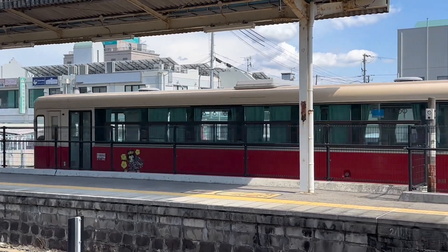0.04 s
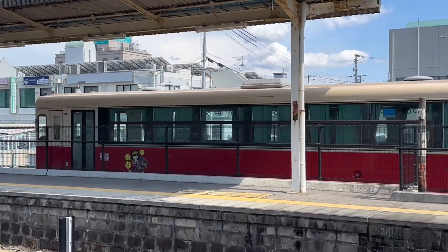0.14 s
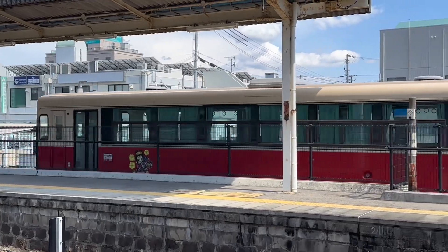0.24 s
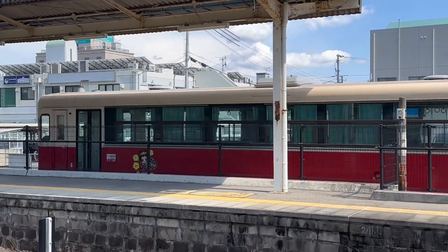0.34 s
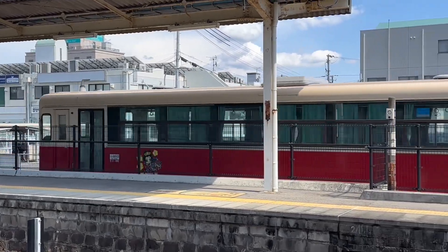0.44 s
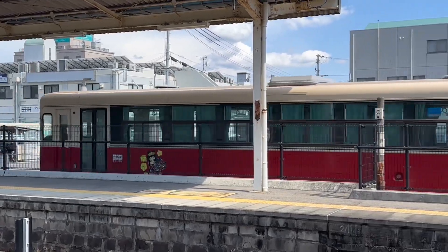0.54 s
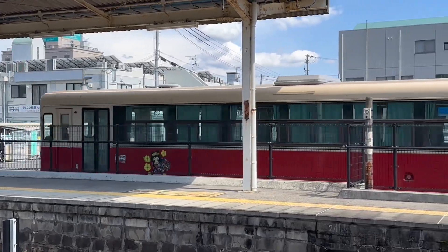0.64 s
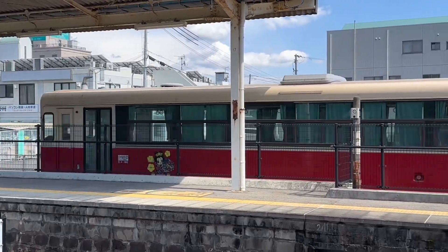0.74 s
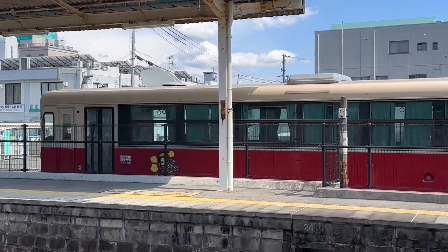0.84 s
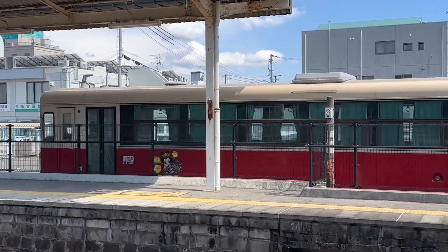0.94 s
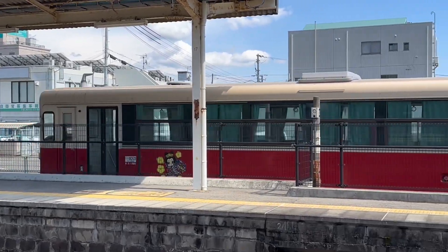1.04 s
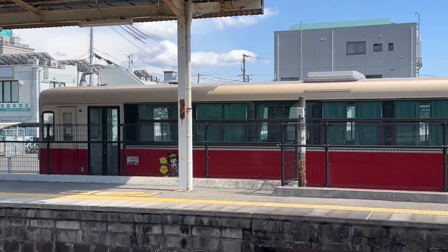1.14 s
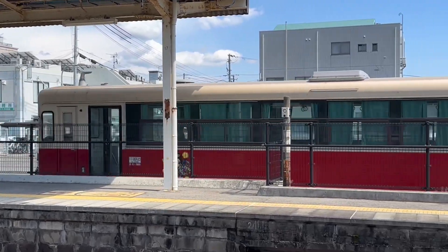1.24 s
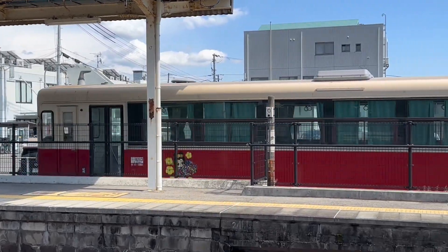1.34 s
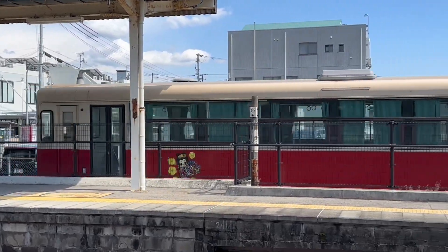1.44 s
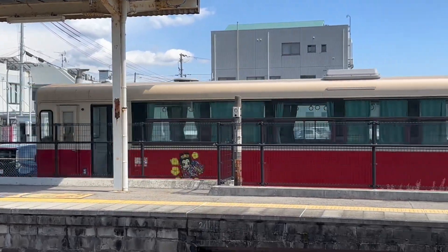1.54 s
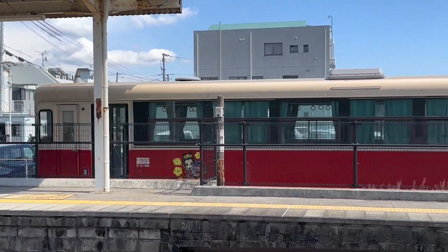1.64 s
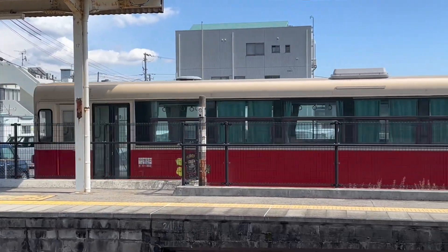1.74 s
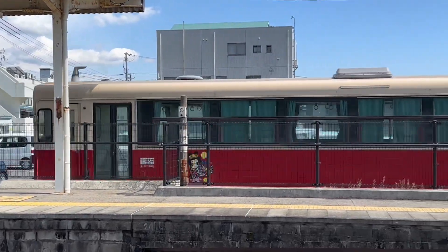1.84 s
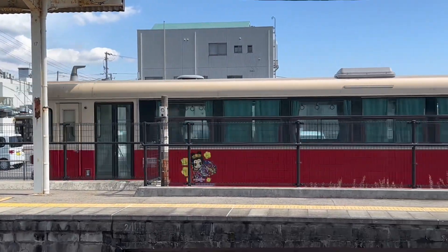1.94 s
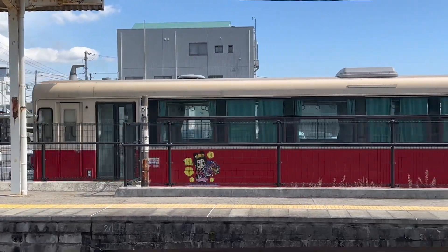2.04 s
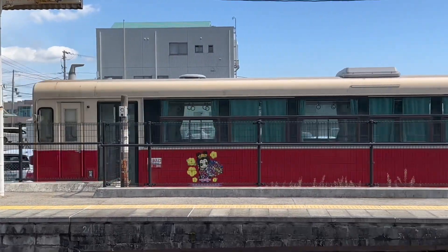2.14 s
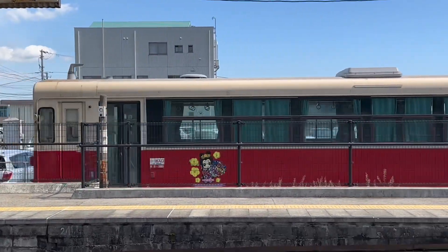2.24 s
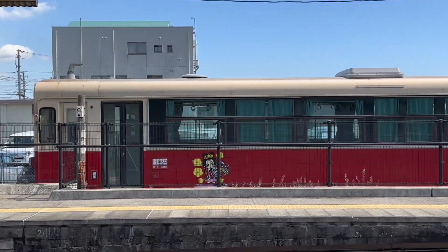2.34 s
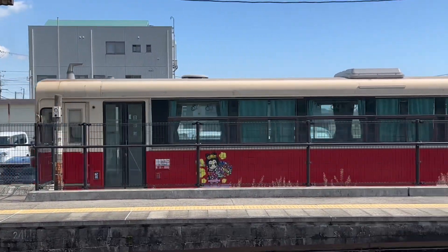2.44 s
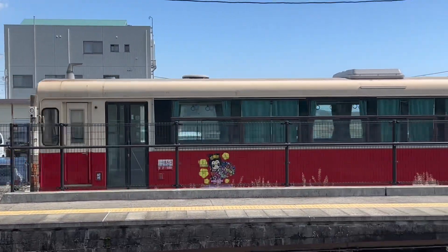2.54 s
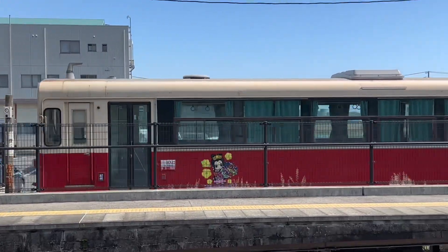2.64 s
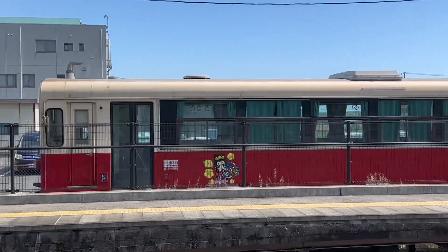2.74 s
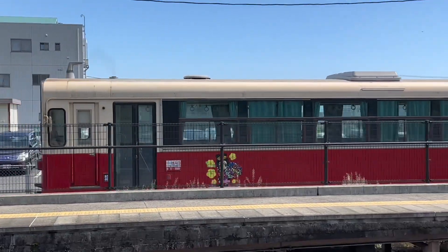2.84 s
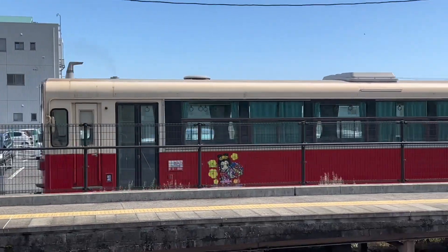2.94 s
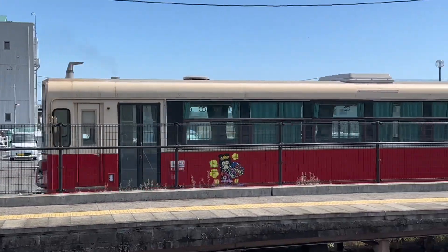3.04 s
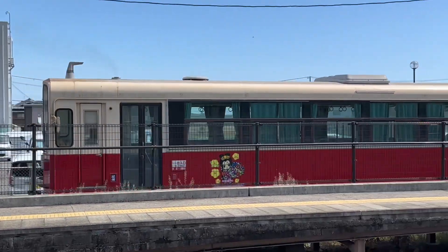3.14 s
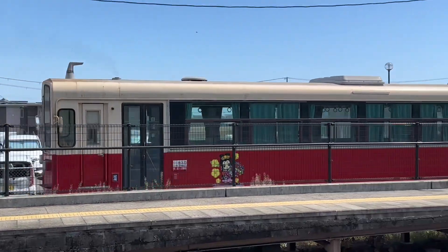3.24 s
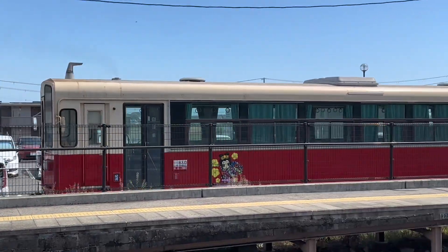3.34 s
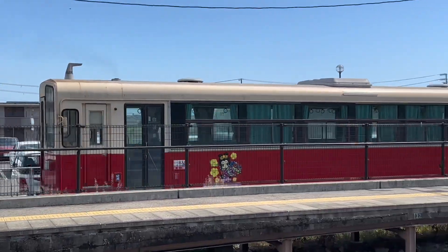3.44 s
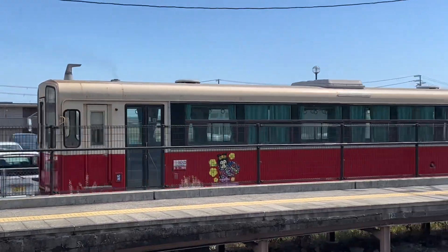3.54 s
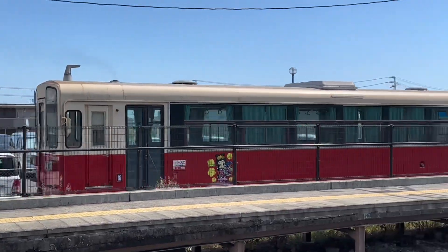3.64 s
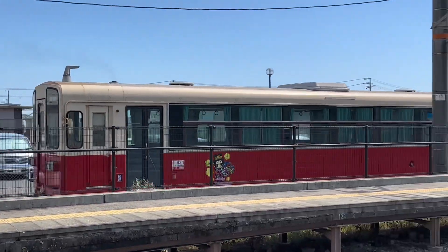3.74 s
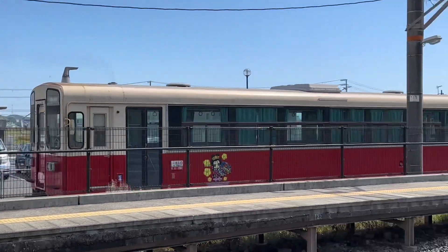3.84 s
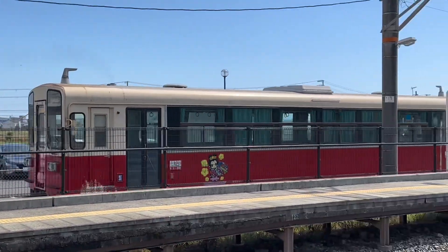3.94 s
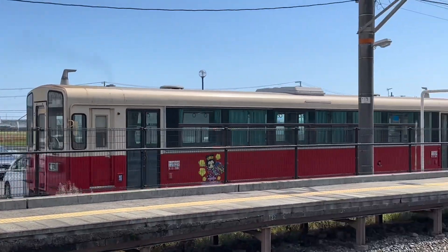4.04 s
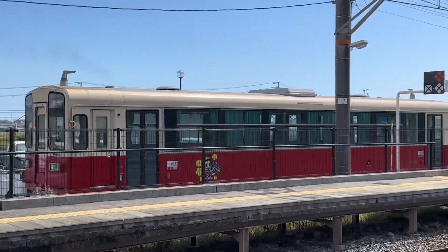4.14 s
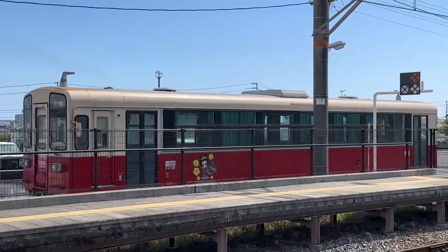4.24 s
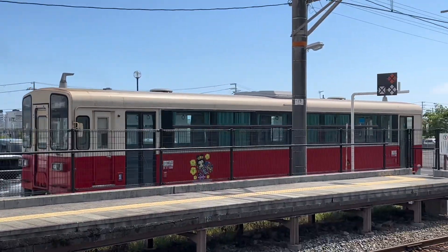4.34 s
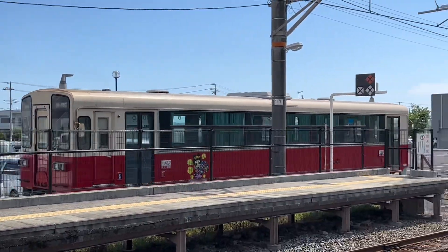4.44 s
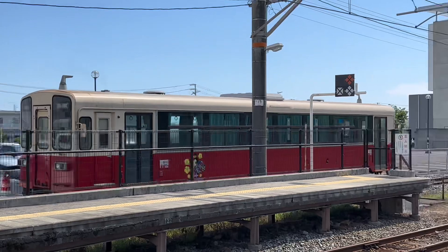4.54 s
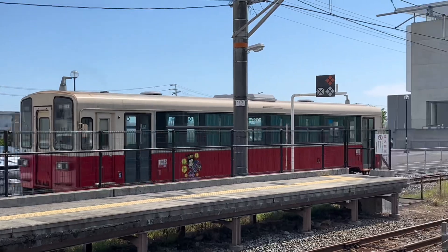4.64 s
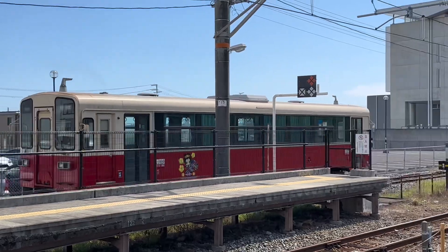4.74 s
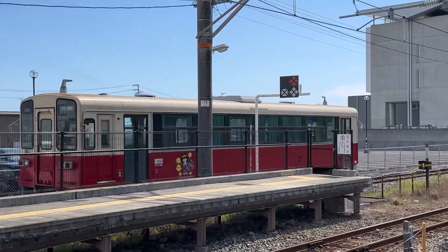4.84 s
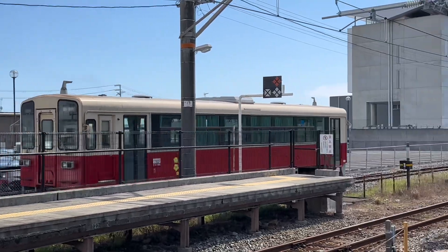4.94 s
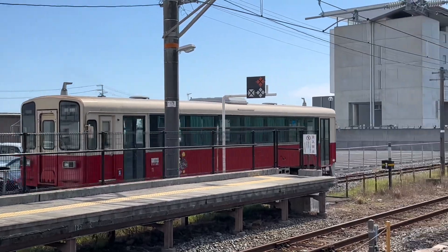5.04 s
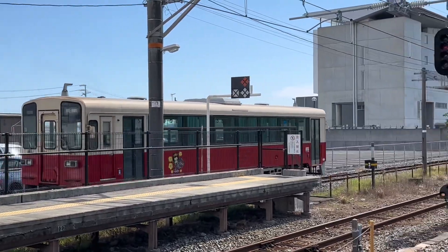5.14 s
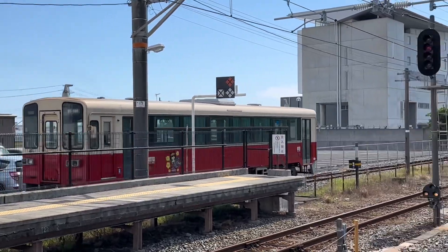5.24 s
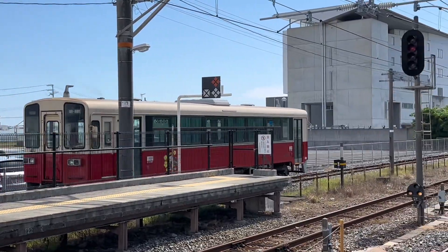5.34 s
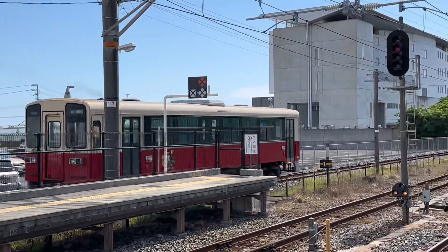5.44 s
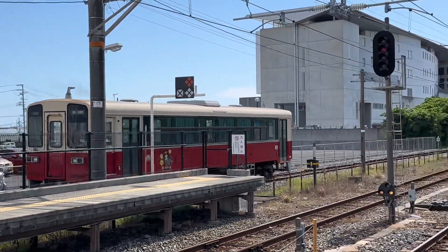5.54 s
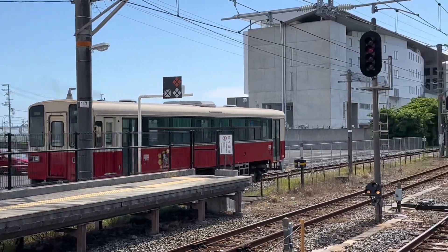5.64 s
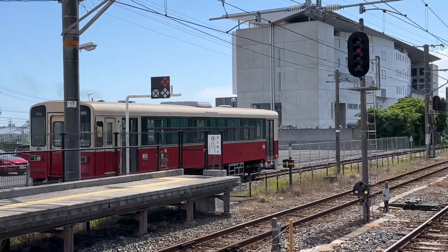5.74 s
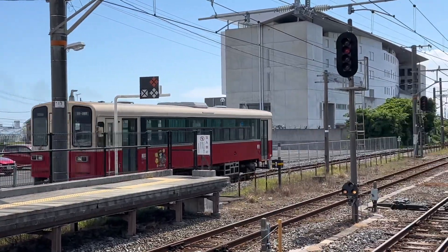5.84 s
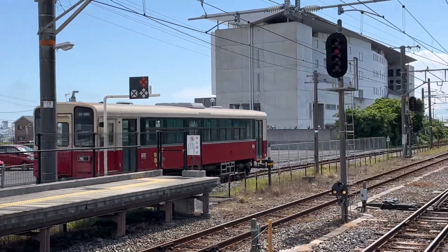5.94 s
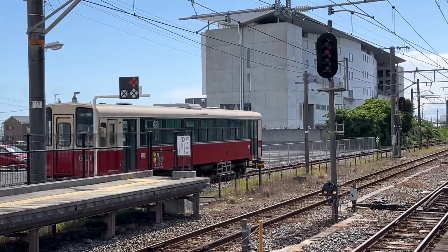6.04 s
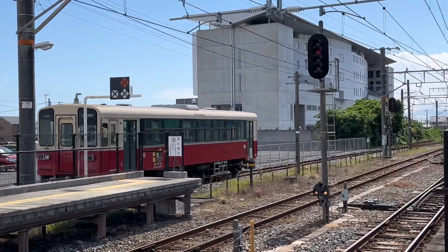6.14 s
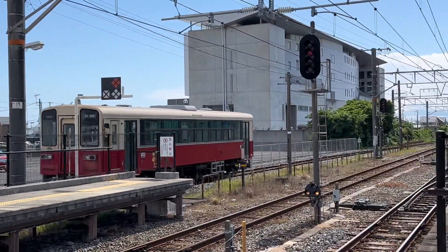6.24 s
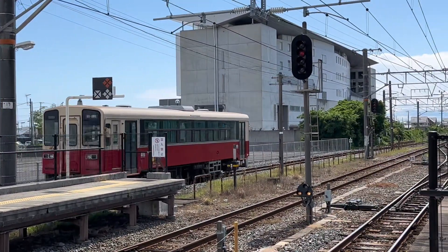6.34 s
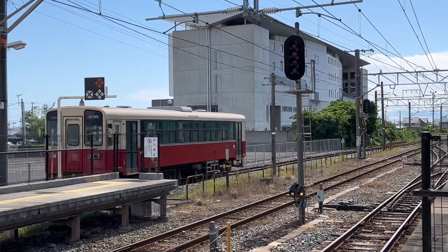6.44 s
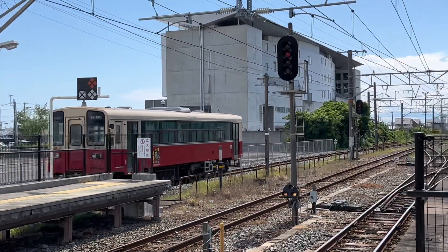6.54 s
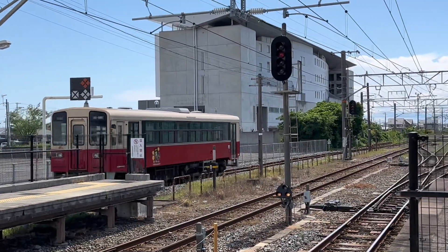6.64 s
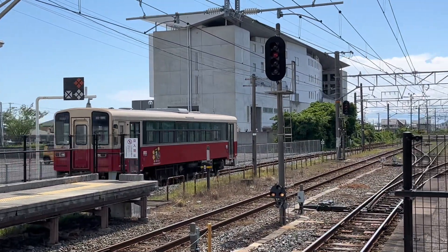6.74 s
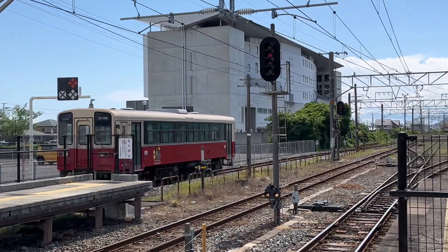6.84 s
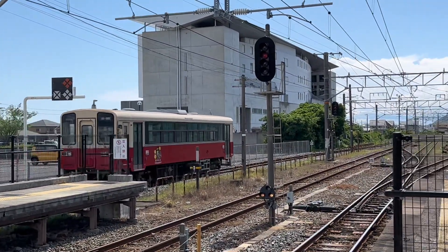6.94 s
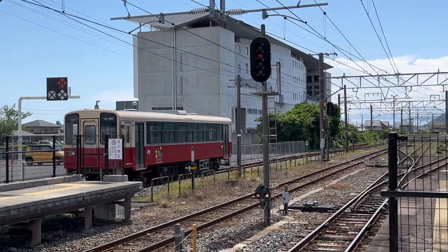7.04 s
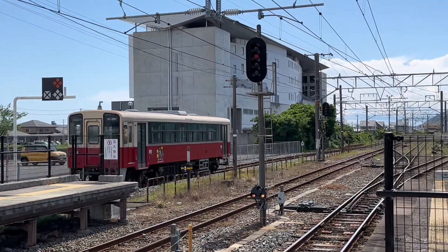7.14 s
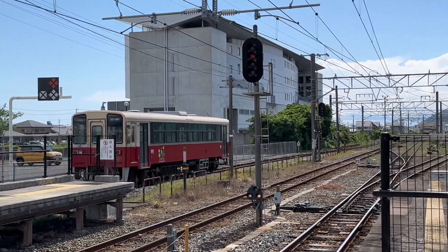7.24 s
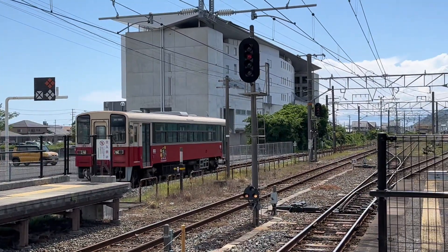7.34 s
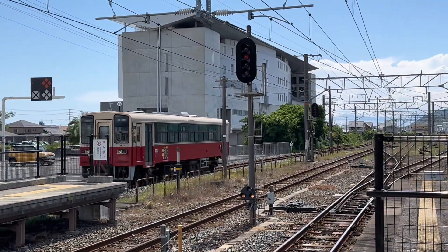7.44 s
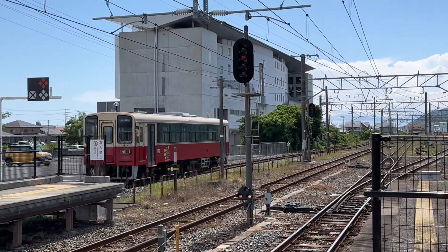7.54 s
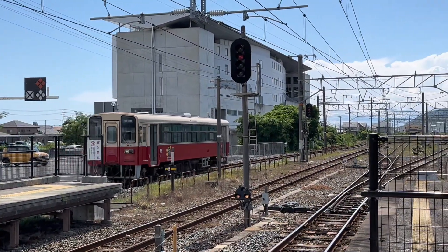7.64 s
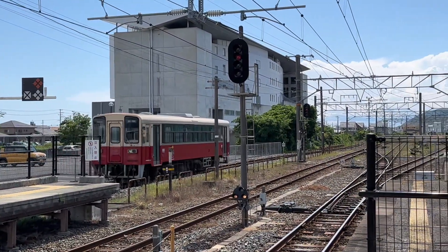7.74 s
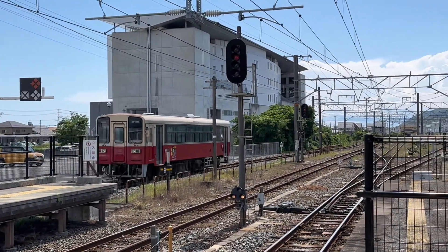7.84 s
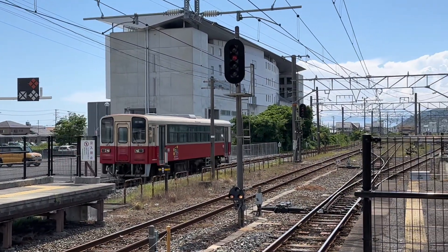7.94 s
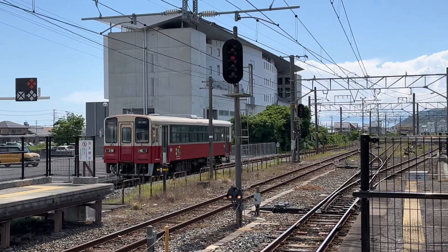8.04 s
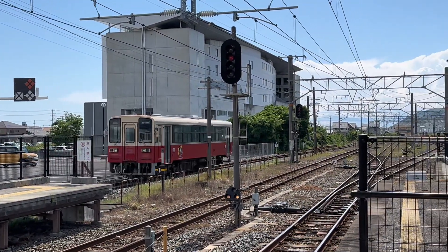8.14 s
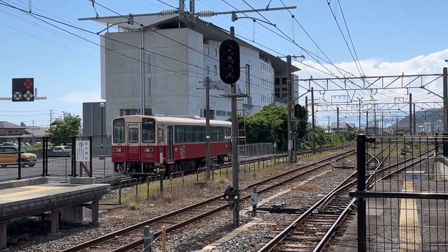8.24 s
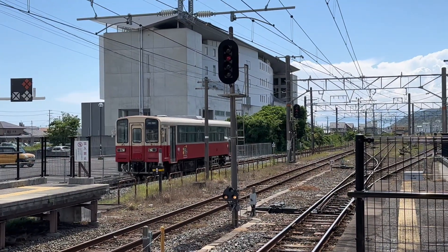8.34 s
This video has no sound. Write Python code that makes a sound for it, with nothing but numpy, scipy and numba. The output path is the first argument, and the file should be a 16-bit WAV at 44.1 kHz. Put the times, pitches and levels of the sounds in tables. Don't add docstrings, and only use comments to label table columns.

```python
import sys
import numpy as np
from scipy import signal
from scipy.fft import rfft, irfft, next_fast_len
from scipy.io import wavfile
from scipy.ndimage import uniform_filter1d
from numba import njit

SR = 44100
rng = np.random.default_rng(int(sys.argv[2]) if len(sys.argv) > 2 else 0)


def int16_out(signal):
    q = np.round(np.clip(np.atleast_2d(signal).T, -1, 1) * 32767)
    wavfile.write(sys.argv[1], SR, q.astype(np.int16))


def makeup_ratio(level_db):
    decades = np.asarray(level_db, float) / 20
    return 10 ** decades


N = 369999
TIME = np.arange(N) / SR
SIZE = next_fast_len(N)
FREQ = np.maximum(np.arange(SIZE // 2 + 1) * SR / SIZE, 1)


def level(x, db):
    return x * makeup_ratio(db) / np.sqrt(np.mean(x ** 2))


def over_time(table):
    s, *columns = np.transpose(table)
    return [np.interp(TIME, s, c) for c in columns]


def over_hz(table):
    hz, value = np.transpose(table)
    return np.interp(np.log(FREQ), np.log(hz), value)


def colour(x, db):
    return level(irfft(rfft(x, SIZE) * makeup_ratio(db), SIZE)[:N], 0)


def noise():
    return rng.standard_normal(N)


def walk(rate, count=N):
    hold = int(SR / rate)
    steps = np.repeat(rng.standard_normal(count // hold + 1), hold)
    return 1.352 * uniform_filter1d(uniform_filter1d(steps, hold), hold)[:count]


# time in seconds, clatter level in dB, engine effort from 0 to 1.
RAILCAR = [(0, -42, 0.84), (.7, -41, 0.56), (1.29, -40, 0.45), (1.55, -36.5, 0.27), (2.4, -36.5, 0.66),
           (2.85, -35.5, 0.47), (3.8, -38, 0.86), (4.3, -38.5, 0.7), (5.16, -42, 0.32), (5.5, -44.5, 0.35),
           (6.2, -49, 0.02), (6.94, -52.5, 0.36), (7.5, -51, 0), (8.06, -54.5, 0.23), (8.39, -55.5, 0.6)]
# time in seconds, firing rate in Hz, level in dB.
FIRING = [(0, 62.1, -47), (.4, 63.98, -31.5), (1, 65.03, -37), (1.4, 68.98, -46.5), (1.9, 73.5, -41.5),
          (2.5, 74.5, -32), (3.1, 76.17, -34), (3.6, 76.64, -44), (4.4, 76.96, -35.5), (5.5, 75.86, -46.5),
          (8.39, 74.26, -49.5)]
# frequency in Hz, density in dB per Hz.
CLATTER_COLOUR = [(60, 10.5), (200, 11), (500, 4), (1000, 6.5), (1900, 1.5), (2700, -6), (3900, -9),
                  (5500, -10.5), (7500, -8.5), (10500, -11), (12200, -19), (15500, -22)]
# centre in Hz, width in Hz, boost in dB.
CASING = [
    (774.3, 55.3, 5),
    (926, 55.4, 3.5),
    (1050, 157, 4),
    (1499, 51, 5),
    (3367, 412, 5.5),
    (6630, 1000, -2),
]
RING_FADES_S = (4.35, 7.3)


def engine():
    hz, note_db = over_time(FIRING)
    phase = 2 * np.pi * np.cumsum(hz * (1 + 0.00609 * walk(12))) / SR
    note = np.sqrt(2) * makeup_ratio(note_db + 1.95 * walk(8.9)) * (np.sin(phase) + 0.217 * np.sin(2 * phase))

    combustion = makeup_ratio(1.2 * np.sin(phase) + .6 * np.sin(phase / 3)) * noise()
    ring_db = sum(db / (1 + (2 * (FREQ - f) / width) ** 2) for f, width, db in CASING)
    spectrum = rfft(combustion, SIZE) * makeup_ratio(over_hz(CLATTER_COLOUR))
    reference = spectrum * makeup_ratio(ring_db) * (FREQ > 1800) * (FREQ < 6500)
    spectrum = spectrum / np.std(irfft(reference, SIZE))
    ring_share = np.interp(TIME, RING_FADES_S, (1, .4))

    clatter_db, effort = over_time(RAILCAR)
    casing_db = -5 + 8.5 * effort
    hiss_db = -3.5 + 3 * effort + 0.279 * (clatter_db + 36)
    clatter, shake = 0, walk(4.967)
    for step in np.arange(12, 29):
        share = np.clip(1 - np.abs(2 * np.log2(FREQ) - step), 0, 1)
        low, high = np.clip((22.5 - step) / 2, 0, 1), np.clip((step - 24) / 3, 0, 1)
        db = clatter_db + low * casing_db + high * hiss_db + .5 * shake + 1.197 * walk(11)
        bare = irfft(spectrum * share, SIZE)[:N]
        ring = irfft(spectrum * share * (makeup_ratio(ring_db) - 1), SIZE)[:N]
        clatter = clatter + makeup_ratio(db) * (bare + ring_share * ring)
    return note + clatter


# start in seconds, end in seconds, first pitch in Hz, last pitch in Hz, level in dB.
WHINES = [(0.197, 1.196, 1050, 1050, -41), (1.292, 2.195, 1040, 1052, -39.5),
          (0.098, 0.695, 808, 800, -43.5), (0, 1.205, 1505, 1490, -46.5), (1.4, 2, 1485, 1478, -45.5),
          (1.602, 2.3, 958, 972, -41), (2.049, 2.946, 874, 890, -38), (2.599, 4.102, 925, 946, -45),
          (1.899, 3.102, 1085, 1160, -40.5), (2.401, 3.304, 1008, 1014, -40), (2.647, 3.199, 780, 772, -41),
          (3.2, 4.3, 828, 822, -43), (3.4, 4.4, 770, 785, -44), (2.71, 4.305, 1040, 1030, -40.5),
          (2.707, 3.803, 1485, 1468, -46.5), (1.4, 1.85, 3460, 3420, -46.5), (1.9, 2.4, 3326, 3322, -52),
          (3.15, 3.699, 3455, 3460, -57.5), (4.65, 5.1, 3435, 3400, -54.5), (5.06, 5.39, 3150, 3125, -54),
          (4.9, 5.15, 1710, 1690, -49), (4.55, 4.8, 1880, 1900, -49), (5.42, 5.6, 2230, 2180, -54),
          (5.6, 5.8, 1655, 1620, -48.5), (5.92, 6.21, 1535, 1425, -51.5), (6.37, 6.51, 2030, 2010, -54.5),
          (2.4, 3.1, 3480, 3350, -52), (4.92, 5.06, 3430, 3420, -50), (5.09, 5.24, 3130, 3110, -54),
          (1.78, 2.2, 1560, 1550, -44), (1.6, 1.85, 2050, 2080, -49), (1.85, 2.1, 2490, 2500, -52),
          (7.4, 7.5, 3200, 3180, -56), (6.38, 6.48, 2200, 2170, -56), (1.45, 1.75, 3300, 3250, -50)]


def whines():
    out = np.zeros(N)
    pitch, strength = walk(80), walk(45)
    for k, (start, end, from_hz, to_hz, db) in enumerate(WHINES):
        on = np.arange(int(start * SR), int(end * SR))
        part = (TIME[on] - start) / (end - start)
        own = (on + k * 41011) % N
        waver_hz = 4 + from_hz / 150 + .4 * (from_hz / 1000) ** 3
        hz = from_hz + part * (to_hz - from_hz) + waver_hz * pitch[own]
        swell = np.sqrt(np.interp(part, (0, 0.316, 1), (0, 1, 0)))
        strength_now = makeup_ratio(db - 4.4 * np.abs(strength[own]) ** 1.22) * 2.507 * swell
        out[on] += strength_now * np.sin(2 * np.pi * np.cumsum(hz) / SR)
    return out


# time in seconds, rumble level in dB, flutter relative to the rumble in dB.
BREEZE = [(0, -31, -6), (.6, -29.5, -3.5), (1.35, -34, -16), (1.7, -34.5, -8), (2.15, -27.5, -2.5),
          (2.6, -31, -7), (3.3, -37.5, -2), (3.8, -27.5, 1.5), (4.25, -28.5, -6.5), (4.52, -25.5, 2),
          (4.85, -25, -2), (5.72, -36, -1.5), (6, -27.5, -1), (6.45, -31.5, -1.5), (6.85, -41, -0.5),
          (7.15, -40, 0.5), (7.55, -32, 3), (8.2, -42.5, -6.5)]
# peak time in seconds, peak in dB, half length in seconds.
PUFFS = [(0.029, -24.5, 0.02625), (0.175, -23.5, 0.0154), (0.453, -27.5, 0.064), (0.792, -25, 0.0345),
         (0.911, -30.5, 0.025), (1.122, -26, 0.059), (1.256, -25.5, 0.041), (1.475, -24.5, 0.047),
         (1.807, -22.5, 0.0575), (2.019, -25, 0.099), (2.469, -22.5, 0.036), (2.906, -26, 0.0325),
         (3.083, -25, 0.032), (3.192, -25, 0.04), (3.472, -29.5, 0.066), (3.724, -32.5, 0.074),
         (3.947, -28, 0.047), (4.429, -23.5, 0.037), (4.541, -22, 0.029), (4.644, -28, 0.069),
         (4.953, -27, .04), (5.098, -26.5, 0.05), (5.345, -32.5, .1), (5.855, -24, 0.0436),
         (6.067, -21.5, 0.039), (6.249, -30.5, 0.037), (7.286, -33, 0.025), (7.857, -26, 0.035),
         (7.967, -35.5, 0.09), (8.385, -23.5, 0.0167)]


def wind():
    rumble_db, flutter_db = over_time(BREEZE)
    coarse = TIME[::100]
    puffs = sum(makeup_ratio(db) ** 2 * np.exp(-((coarse - s) / half) ** 2) for s, db, half in PUFFS)
    puffs = np.interp(TIME, coarse, puffs)
    steady = makeup_ratio(rumble_db) ** 2
    flutter = steady * makeup_ratio(flutter_db) ** 2 + puffs * makeup_ratio(-6) ** 2
    return 10 * np.log10(steady + puffs), 10 * np.log10(flutter)


# start in seconds, peak in dB, pitch in Hz.
BUFFETS = [(0.014, -21, 124), (0.162, -17.5, 67), (0.385, -17.5, 62.3), (0.519, -12.5, 72.7),
           (0.756, -20, 59.2), (0.876, -21, 61.9), (1.004, -25, 67.3), (1.109, -13, 105),
           (1.231, -17.5, 75), (4.974, -20.5, 85), (1.47, -21.5, 75.7), (1.749, -13.5, 147),
           (2.291, -12, 73), (2.415, -18, 70.0), (2.557, -20.5, 71), (2.863, -23.5, 96.9),
           (3.037, -13, 78.8), (3.143, -21, 126), (3.394, -29.5, 45.8), (3.394, -14, 64.6),
           (3.502, -15.5, 67), (3.6, -17.5, 61.5), (3.683, -23.5, 76), (3.915, -21.5, 67.3),
           (4.004, -17.5, 148), (4.073, -23, 105), (4.188, -16.5, 86.1), (4.416, -21.5, 45.8),
           (4.417, -17, 108), (4.506, -13.5, 75.4), (4.761, -15, 111), (4.906, -12, 67.3), (5.061, -16, 78),
           (5.152, -13, 70.0), (5.353, -21, 123.5), (5.812, -19, 67), (6.028, -13.5, 80.7),
           (6.191, -19.5, 70.0), (6.33, -24, 72.4), (6.422, -24.5, 149), (6.688, -30, 117),
           (6.77, -34.5, 116), (6.934, -36, 45.8), (6.934, -23, 117), (6.994, -25.5, 88.8),
           (7.425, -23, 140), (7.277, -18, 105.2), (7.415, -25, 137), (7.48, -18, 147.5),
           (7.591, -18.5, 148), (7.71, -23, 145), (7.833, -15.5, 86.7), (7.99, -28.5, 51.1),
           (8.069, -22, 67.3), (8.167, -35.5, 56.5), (4.433, -8.5, 85), (4.538, -8, 79.6),
           (4.601, -10.5, 74.7), (5.843, -11.5, 80), (8.371, -30.5, 69.92)]


def buffets():
    out = np.zeros(N)
    rise_s, cycles = 0.0116, 1.2
    for s, db, hz in BUFFETS:
        near = slice(int(s * SR), int((s + .15) * SR))
        age = np.maximum(TIME[near] - s, 0)
        push = (1 - np.exp(-age / rise_s)) * np.exp(-age * hz / cycles)
        out[near] += makeup_ratio(db - 2) * 2 * push * np.sin(2 * np.pi * hz * age)
    return out


@njit
def swirls(start, hz, size, fall, fade, count):
    y = np.zeros(count)
    for k in range(len(start)):
        phase, f, a = 0., hz[k], 1.
        for i in range(start[k], min(count, start[k] + 4000)):
            attack = min((i - start[k]) / 85., 1.)
            y[i] += size[k] * a * attack * np.sin(phase)
            phase += 2 * np.pi * (f + 70) / SR
            f *= fall
            a *= fade
    return y


# frequency in Hz, density in dB per Hz.
RUMBLE = [(20, -35), (35, -6), (55, 5.5), (75, 1.5), (110, 1.5), (160, -4.5), (260, -27.5), (600, -120)]
# frequency in Hz, density in dB per Hz.
FLUTTER = [(80, -24.5), (150, -3.5), (250, -5.5), (400, -14.5), (650, -21.5), (1100, -44), (2500, -120)]
# start in seconds, peak in dB, sharpness in dB.
EDDIES = [(0.03, -16.5, -12.5), (.194, -16.5, -8.5), (.618, -18.5, -9.5), (.758, -12.5, -9),
          (0.798, -13.5, -14), (1.13, -13, -7), (1.292, -21.5, -13), (1.404, -20.5, -9),
          (1.494, -17.5, -16), (1.567, -16, -5.5), (1.838, -16.5, -14.5), (2.709, -20, -8),
          (3.152, -14, -11), (3.769, -15, -14.5), (3.834, -14, -13), (4.021, -11.5, -7),
          (4.526, -8.5, -15.5), (4.664, -17, -16), (4.763, -17, -11.5), (4.963, -14, -6),
          (5.156, -12.5, -16.5), (5.628, -25.5, -9), (5.798, -18, -9), (5.829, -18.5, -13.5),
          (6.337, -20.5, -15), (7.312, -22.5, -14), (7.424, -18, -18), (7.48, -25.5, -18),
          (7.924, -21.5, -10), (8.077, -20.5, -9.5)]
# start in seconds, peak in dB, sharpness in dB.
MORE_EDDIES = [(0.236, -20, -11.5), (0.295, -23.5, -16), (0.329, -21.5, -13.5), (0.515, -17.5, -10.5),
               (0.922, -19.5, -14), (1.028, -19.5, -11), (1.234, -30.5, -15.5), (1.302, -19, -14),
               (1.521, -24, -11.5), (1.654, -25.5, -14), (2.039, -25, -14), (2.336, -17.5, -11.5),
               (2.874, -13.5, -13.5), (2.91, -17, -10), (3.192, -20, -11.5), (3.967, -16, -12.5),
               (4.051, -17.5, -13.5), (4.163, -26, -14.5), (4.468, -10, -11.5), (4.591, -13, -15),
               (5.249, -20.5, -15), (5.868, -32, -14), (6.124, -18, -12.5), (6.223, -19.5, -11.5),
               (6.269, -24, -14), (6.37, -28.5, -13.5), (6.411, -33, -11), (6.434, -27, -18),
               (6.485, -23.5, -12), (6.535, -30, -14), (6.619, -24.5, -14), (6.674, -29, -13),
               (6.709, -39.5, -13.5), (6.943, -28.5, -10.5), (7.009, -29.5, -15), (7.279, -27, -13),
               (7.509, -22.5, -13), (7.55, -31, -14.5), (7.644, -30.5, -15), (7.904, -28, -11.5),
               (7.984, -33.5, -15.5), (8.125, -41.5, -18.5), (8.139, -33.5, -11), (8.374, -28, -17),
               (.747, -20.5, -14), (.768, -17, -11.5), (0.819, -18.5, -10), (3.702, -24.5, -18.5),
               (3.748, -21.5, -15.5), (3.934, -17.5, -14), (4.361, -16, -15.5), (4.411, -14, -15),
               (4.488, -18, -15), (4.68, -16, -18.5), (4.692, -17.5, -11.5), (6.005, -21, -11),
               (6.232, -17, -12), (6.272, -24.5, -15)]
# first start in seconds, beat in seconds, peak in dB, growth per eddy in dB, sharpness in dB.
SHEDDING = [
    (0.406, 0.0396, -18.5, 0, -11),
    (1.615, 0.0734, -20.5, -2, -12.5),
    (4.346, 0.0258, -16.5, -0.25, -15),
    (5.929, 0.0412, -23.5, 0, -15),
    (6.201, .095, -20.5, -4, -19),
    (7.714, 0.0426, -21.5, 2, -14.5),
    (7.876, 0.0945, -25.5, -5, -13.5),
]


def breeze():
    rumble_db, flutter_db = wind()
    rumble = makeup_ratio(1.88 * walk(30)) * colour(noise(), over_hz(RUMBLE))
    flutter = makeup_ratio(2.85 * walk(55)) * colour(noise(), over_hz(FLUTTER))
    when, pitch, strength = rng.random((700, 3)).T
    small = swirls((when * N).astype(int), 150 + 400 * pitch, makeup_ratio(9 * strength ** 2), 0.9996, 1.0, N)

    further = [(s, db - 0.5, sharp_db) for s, db, sharp_db in MORE_EDDIES]
    shed = [(s + k * beat, db + k * grow_db, sharp_db)
            for s, beat, db, grow_db, sharp_db in SHEDDING for k in range(4)]
    s, db, sharp_db = np.transpose(list(EDDIES) + further + shed)
    start_hz = 1250 * 2 ** (np.clip(sharp_db, -18, -5) / 12)
    strong = swirls((s * SR).astype(int), start_hz, makeup_ratio(db - 1.0), 0.9947, 0.9978, N)
    torn = colour(noise(), over_hz(FLUTTER) + 3 * np.log2(FREQ))
    strong = strong + 1.026 * uniform_filter1d(np.abs(strong), 350) * torn

    patchy_air = level(flutter, -5.5) + level(small, -8.5)
    return makeup_ratio(rumble_db) * level(rumble, -1.28) + makeup_ratio(flutter_db) * patchy_air + strong + buffets()


def side_breeze():
    rumble_db, _ = wind()
    spectrum = [(25, -26.5), (60, 6.5), (150, -0.5), (500, -18.5), (1400, -35), (1900, -120)]  # Hz, dB per Hz
    return makeup_ratio(rumble_db - 13 + 3.7 * walk(30)) * colour(noise(), over_hz(spectrum))


# frequency in Hz, density in dB per Hz.
TOWN = [(35, -34), (60, 2), (237, -23.5), (547, -14), (815, -26.5), (1240, -29), (1510, -23), (2700, -29.5),
        (3500, -28.5), (4200, -40.5), (5180, -44), (5330, -38), (5480, -45), (7000, -51), (9100, -72),
        (15400, -120)]


def town():
    return makeup_ratio(-43.0 + walk(3.064)) * colour(noise(), over_hz(TOWN))


# peak time in seconds, level in dB, boom of the bogie in dB,
# flange squeak in dB, smear as a factor.
JOINTS = [(.325, -34.5, 4.5, -40.5, 1.32), (.714, -33, 7.5, -40, 2.28), (2.385, -26.5, 4, -39.5, 1.24),
          (2.726, -25.5, 2.5, -27.5, 1.16), (4.179, -29, 6, -40, 1.63), (4.478, -27, 7, -39.5, 1.37),
          (5.827, -38.5, 12, -40, 1.5), (6.096, -37.5, 13.5, -31, 1.19), (7.325, -42, 3, -41, 1.24),
          (7.424, -36.5, 0, -33.5, 1.14), (7.612, -39.5, 1.5, -40.5, 1.9), (7.703, -39.5, 6.5, -20.5, 0.68),
          (8.145, -51.5, 6.5, -38, 1.36)]
# frequency in Hz, density in dB per Hz.
RATTLE_COLOUR = [(300, 12.5), (700, 4.5), (1500, 3.5), (2200, -3.5), (3200, -0.5), (4600, -10.5),
                 (6200, -11), (7500, -8.5), (10500, -13.5), (15500, -37)]


def joints():
    rattle, boom, squeak, thud = np.zeros((4, N))
    for s, db, boom_db, squeak_db, smear in JOINTS:
        near = slice(int((s - .1) * SR), int((s + .6) * SR))
        age = TIME[near] - s
        swell = np.exp(-(age / smear / 0.0176) ** 2 * 1.7)
        decay = 0.864 * np.exp(-np.abs(age) / smear / 0.0312) + 0.308 * np.exp(-np.abs(age) / 0.085)
        rattle[near] += makeup_ratio(db) * np.where(age < 0, swell, decay)
        since = np.maximum(age + .025, 0)
        rise_s = .0015 if boom_db > 10 else .012
        boom[near] += makeup_ratio(db + boom_db) * (1 - np.exp(-since / rise_s)) * np.exp(-since / 0.0368)
        thud[near] += makeup_ratio(db + boom_db - 2.5) * (1 - np.exp(-since / 0.0046)) * np.exp(-since / 0.0866)
        squeak[near] += makeup_ratio(db + squeak_db) * np.exp(-(age / np.where(age < 0, .03, .055)) ** 2)

    bed = thud * colour(noise(), -14 * np.log2(FREQ / 210) ** 2)
    bogie = colour(noise(), -30 * np.log2(FREQ / 870) ** 2)
    flange = colour(noise(), -np.minimum(6 * ((FREQ - 14800) / 500) ** 2, 120))
    grain = makeup_ratio(2.0 * walk(500)) * noise()
    clank_db = over_hz(RATTLE_COLOUR) - 40 * (FREQ < 250) + 2 * np.sin(FREQ / 70.)
    clank = rfft(colour(grain, clank_db), SIZE)
    top = np.clip(np.log2(FREQ / 6000), 0, 1)
    dull_db = -1.92 * np.maximum(TIME - .3, 0)
    clank = irfft(clank * (1 - top), SIZE)[:N] + makeup_ratio(dull_db) * irfft(clank * top, SIZE)[:N]
    return bed + 1.298 * rattle * clank + 0.647 * boom * bogie + squeak * flange


# start in seconds, peak in dB, pitch in Hz.
KNOCKS = [(.697, -23, 945), (.709, -26.5, 904), (4.399, -21, 516), (4.42, -18.5, 480), (4.47, -20.5, 621),
          (4.476, -26, 854), (4.505, -19, 558), (4.572, -20.5, 540), (4.84, -23.5, 475), (4.93, -23, 473),
          (7.325, -29.5, 421), (7.336, -27, 523), (5.805, -34, 783), (5.822, -24, 718), (5.842, -30.5, 770),
          (5.866, -29.5, 720), (6.071, -24.5, 894), (6.077, -16.5, 751), (6.088, -29, 1057),
          (6.093, -20, 637), (6.112, -31, 1044), (6.135, -20, 557), (6.232, -36, 484), (6.264, -30.5, 680),
          (8.124, -27.5, 836), (8.14, -35, 720), (8.158, -35.5, 798)]


def knocks():
    out = np.zeros(N)
    t60_s, rise_s, partner, partner_db = 0.0522, 0.00106, 1.2, -9
    for s, db, hz in KNOCKS:
        near = slice(int(s * SR), int((s + .08) * SR))
        age = np.maximum(TIME[near] - s, 0)
        modes = np.sin(2 * np.pi * hz * age) + makeup_ratio(partner_db) * np.sin(2 * np.pi * hz * partner * age)
        out[near] += makeup_ratio(db - 60 * age / t60_s) * (1 - np.exp(-age / rise_s)) * modes
    return out


# start in seconds, peak in dB.
TICKS = [(6.2507, -48), (6.5346, -48.5), (6.7241, -51.5), (6.776, -52.5), (6.8284, -50), (6.8803, -52.5),
         (6.9342, -55.5), (6.9716, -54.5), (7.1018, -57), (7.1407, -52.5), (7.217, -52.5), (7.2759, -57),
         (7.3073, -53), (7.3377, -50.5), (7.3956, -53), (7.5193, -56.5), (7.5817, -56.5), (7.682, -54.5),
         (7.9798, -64.5), (8.0771, -61.5), (8.108, -53.5), (8.2442, -56.5), (8.2801, -55.5), (8.3118, -54)]


def ticks():
    burst = np.zeros(N)
    for s, db in TICKS:
        near = slice(int(s * SR) + 1, int(s * SR) + 3000)
        burst[near] += makeup_ratio(db - 4) * np.exp(-(TIME[near] - s) / 0.0065)
    spectrum = [(3000, -40), (7000, -6.5), (10500, 5.0), (13000, -1.5), (16000, -13.0)]  # Hz, dB per Hz
    return burst * colour(noise(), over_hz(spectrum))


def scene():
    railcar = engine() + whines() + joints() + knocks() + ticks()
    mid = railcar + breeze() + town()
    return mid + side_breeze() * np.array([[1], [-1]])


def patchy(spectrum, lo_hz, hi_hz, open_db):
    inside = (FREQ >= lo_hz) * (FREQ < hi_hz)
    band = irfft(spectrum * inside, SIZE)
    power_db = 10 * np.log10(uniform_filter1d(band[:N] ** 2, 2048) + 1e-18) + 5 * walk(22)
    band[:N] *= uniform_filter1d(1. * (power_db > open_db), 700)
    return rfft(band) * inside


def roll_off(x):
    return signal.sosfilt(signal.butter(12, 15740, fs=SR, output="sos"), x)


# frequency in Hz, lead of the left channel in radians.
TURN = [(30, -.42), (400, -.5), (1350, -.52), (1900, 0), (2600, 0), (3300, .5), (4300, .35), (4700, 0),
        (6500, 0), (7250, 1.2), (7750, np.pi), (8800, np.pi), (9300, 1.4), (10400, .7), (11000, 0),
        (12900, 0), (14100, -1.3), (15600, -1.9)]
ALIKE_S = (0.1924, 5.043)


def record(dry):
    deep_cut = signal.butter(2, 28, "high", fs=SR, output="sos")
    rounded = np.tanh(1.5 * dry) / 1.5
    left, right = rfft(signal.sosfilt(deep_cut, rounded), SIZE)
    half = over_hz(TURN) / 2
    late = .75 + .65 * np.exp(-2j * np.pi * FREQ * .027)
    middle = (left + right) / 2
    mid = middle * np.cos(half)
    side = (left - right) / 2 + middle * 1j * np.sin(half) * late

    steady_side = side * ((FREQ < 2600) | (FREQ >= 4700))
    side = steady_side + patchy(side, 2600, 3600, -60) + patchy(side, 3600, 4700, -57)
    mid = mid * (FREQ < 15100) + patchy(mid, 15100, 16000, -80)

    alike = np.pad(sum(np.abs(TIME - s) < 0.015 for s in ALIKE_S), (0, SIZE - N))
    turned = (FREQ > 7750) * (FREQ < 8800)
    moved = rfft(alike * irfft(side * turned, SIZE)) * turned
    mid, side = mid + moved, side - moved
    wide = irfft(np.array([mid + side, mid - side]), SIZE)[:, :N]
    return roll_off(wide)


dry = scene()
out = record(dry)
int16_out(out)
```